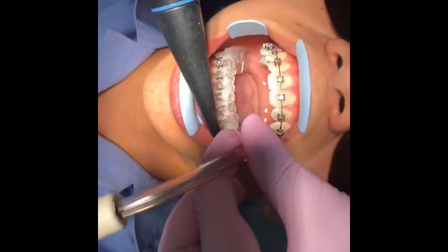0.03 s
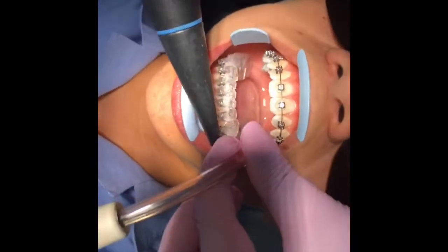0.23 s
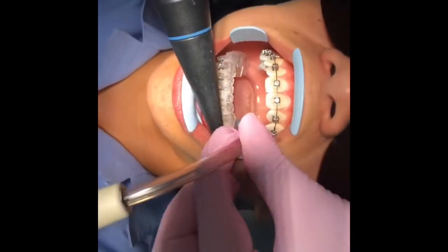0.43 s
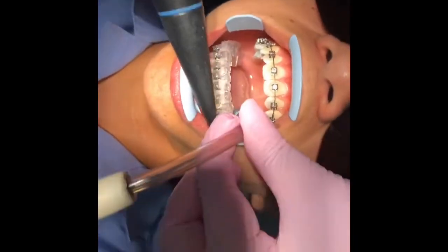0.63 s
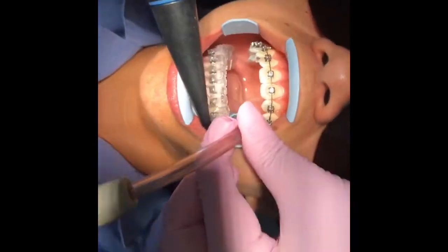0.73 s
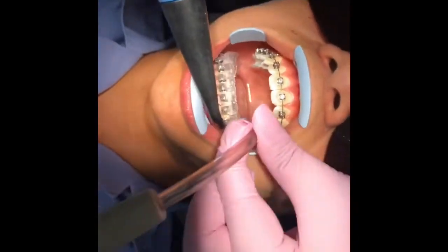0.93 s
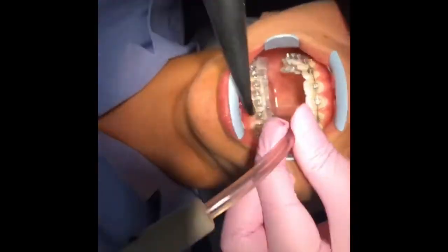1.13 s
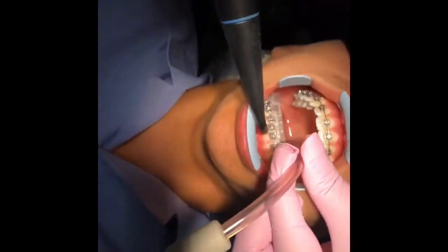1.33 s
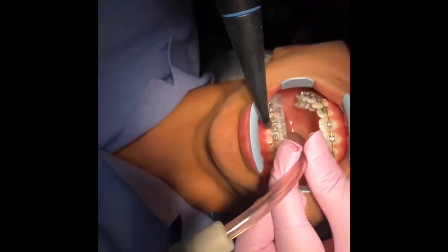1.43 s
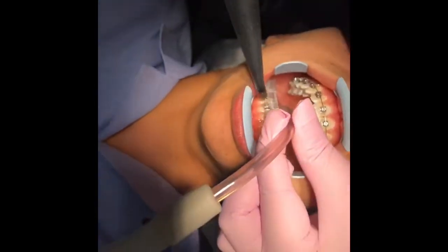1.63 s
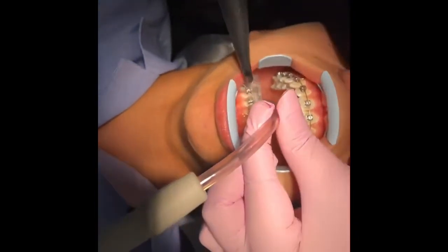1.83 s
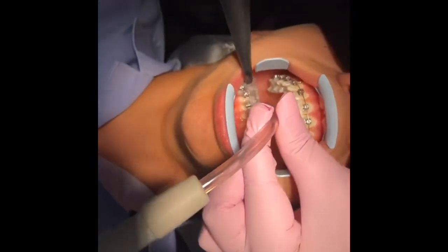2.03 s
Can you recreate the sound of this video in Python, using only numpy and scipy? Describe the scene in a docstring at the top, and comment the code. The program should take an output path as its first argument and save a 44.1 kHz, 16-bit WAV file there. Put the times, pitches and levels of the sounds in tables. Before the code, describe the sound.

Wet, slurping hiss of dental suction in an open mouth, dropping after a soft pop.

```python
"""A dental suction tip hisses and slurps, drawing air and water inside an open mouth.
Turbulent air and droplets excite the tube and the mouth cavity, with a breathy whistle on top.
The tip is half covered for a while: a low pop, then the hiss drops and changes colour.
Gulps of water ring the cavity; machines hum and rumble in the small room. The sound is mono."""
import sys
import numpy as np
from scipy import signal
from scipy.fft import rfft, irfft
from scipy.io import wavfile
from scipy.ndimage import uniform_filter1d

SR = 44100
rng = np.random.default_rng(int(sys.argv[2]) if len(sys.argv) > 2 else 0)


def persist_wave(psi):
    """Save psi, clipped to +-1, as 16-bit WAV."""
    counts = np.round(np.clip(psi, -1, 1) * 32767).astype(np.int16)
    wavfile.write(sys.argv[1], SR, np.atleast_2d(counts).T)


N = 92213

# faders of the air flow at the tip: time_s, hiss_db, cavity_db, treble_db, whistle_db
AIR_FLOW = [(0, -25.5, -40, -33.5, -45), (.03, -19.5, -24.5, -29.5, -46), (.11, -22.5, -30, -32.5, -44),
            (.24, -22, -29, -33, -34.5), (.26, -19, -40, -31, -37.5), (.31, -19, -23, -32, -32.5),
            (.34, -20.5, -25.5, -30, -36.5), (.53, -20.5, -27, -32.5, -36.5),
            (.57, -19, -25.5, -29.5, -28.5), (.6, -20, -26, -32.5, -36), (.74, -20.5, -28.5, -30, -30),
            (.82, -19, -27, -30, -32), (1.09, -20.5, -30, -30.5, -31), (1.14, -22, -33.5, -29.5, -27.5),
            (1.24, -31, -35, -36.5, -43), (1.3, -33, -36, -36, -42), (1.47, -35.5, -41, -40.5, -45.5),
            (1.59, -35, -39, -39.5, -48), (1.62, -30.5, -37, -37.5, -44), (1.8, -28.5, -34, -34.5, -43),
            (1.9, -29, -37.5, -36, -43), (2.02, -31.5, -39.5, -36, -46), (2.09, -31, -35, -35, -43)]
# the tip is covered, then opens at another place: time_s, position (0 open, 1 covered, 2 moved)
TIP_POSITION = [(0, 0.027), (1.12, 0.34), (1.24, 0.47), (1.58, 1.06), (1.62, 1.72), (2.09, 2)]
# resonances of tube and mouth, levels relative: pitch_hz, base_width_hz, open_db, covered_db, moved_db
TUBE_MODES = [(1570, 182, -15, -2, -14), (2285, 730, -16.5, 1, -19.5), (2493, 180, -10, -22, -24),
              (2658, 90, 0.5, -1, -14), (2715, 65, -6.5, -3, 4), (2840, 190, -8, -3, -4),
              (3060, 503, -3.5, 5, -3.5), (3670, 970, -28, -7, -6), (4360, 410, -15, 0.5, -3.5),
              (4774, 126, 1.5, 6, -6), (5046, 160, -4.5, 1, -9), (5295, 820, -5.5, 1, -7),
              (6450, 610, -6.5, -10, -13), (7040, 940, -9.5, 0.5, -9.5), (7940, 1050, -13, -3, -11)]
# treble resonances, levels relative: pitch_hz, base_width_hz, open_db, covered_db, moved_db
TREBLE_MODES = [(11000, 990, 0, 8, 5.5), (12200, 650, -8, -6, 6), (13430, 1550, -1, -1, 2),
                (14200, 630, -6, -11, -16), (15000, 900, 1, -11, -4)]
# close resonances of the mouth cavity: pitch_hz, base_width_hz, relative_db
CAVITY_MODES = [(1035.4, 38.4, 4.5), (1102, 80, -3), (1203.5, 121, -4.5), (888, 308, -17)]
# gulps of water that ring the cavity: start_s, peak_db, pitch_hz, rise_s
WATER_GULPS = [(0.0443, -18, 1041, 0.0035), (0.0742, -20.5, 1126, 0.0043), (0.255, -20.5, 1068, 0.0035),
               (0.2844, -21, 1036, 0.0035), (0.2944, -13.5, 1100, 0.0038), (0.3724, -34, 1060, 0.004),
               (0.4618, -16.5, 1060, 0.0042), (0.5061, -14, 1060, 0.0044), (0.566, -25, 1096, 0.004),
               (0.6934, -14, 1045, 0.0042), (0.7201, -16, 1051, 0.0043), (1.05, -26.5, 1110, 0.004),
               (1.1819, -30, 1204, 0.004), (1.2624, -33, 1110, 0.0043), (1.283, -24, 1150, 0.0038),
               (1.3779, -28, 1080, 0.0037), (1.4105, -34, 1090, 0.0034), (1.6145, -28, 1147, 0.0046),
               (1.7499, -28, 1068, 0.0038), (1.7966, -49, 1170, 0.004), (1.917, -27, 1060, 0.0037)]
# EQ curve of the room rumble: frequency_hz, relative_db
RUMBLE_EQ = [(12, -35), (20, -28), (38, 3.5), (87, -1.5), (129, -8.5), (226, -7), (267, -8.5), (519, -18),
             (800, -19.5), (1040, -11), (1760, -120)]
# machine tones: pitch_hz, rms_db
HUM_TONES = [(49, -55), (74, -49), (100, -45.5), (226, -55)]

RUMBLE_DB = -39
HUM_WAVER_DB, HUM_WAVER_PER_S, HUM_PITCH_DRIFT = 1, 4.98, 0.016
ECHO_DB, ECHO_T60_S = -13, .2
POP_S, POP_DB, POP_HZ, TICK_HZ, TICK_RELATIVE_DB = 1.19, -26, 530, 1500, -5
SPLASH_RELATIVE_DB, SPLASH_RISE_S = -17.5, .006
DROPS_PER_S, DROP_SPREAD_DB, DROPS_RELATIVE_DB = 2500, 1, -9.5
FLUTTER_DB, FLUTTER_PER_S = .55, 60  # the whole stream together
FLICKER_DB, FLICKER_PER_S = .58, 17.82  # each tube or treble resonance alone
WHISTLE_HZ, WHISTLE_BASE_WIDTH_HZ = 9616, 910
HIGH_CUT_HZ = 15770


def undb(db):
    """Gain from dB."""
    return 10 ** (np.asarray(db) / 20)


def unit(x):
    """Scale to rms 1."""
    return x / np.sqrt(np.mean(x ** 2))


def curve(table, column):
    """One column of a time table as an automation curve."""
    rows = np.array(table, float)
    return np.interp(np.arange(N) / SR, rows[:, 0], rows[:, column])


def ring(x, hz, *widths_hz):
    """Two-pole resonances in series, one per width, with gain 1 at the centre."""
    for width_hz in widths_hz:
        x = signal.lfilter(*signal.iirpeak(hz, hz / width_hz, fs=SR), x)
    return x


def wobble(per_s):
    """Smooth random modulation at rms 1, without slow drift."""
    hold = int(SR / per_s)
    steps = np.repeat(rng.standard_normal(N // hold + 1), hold)
    smooth = uniform_filter1d(uniform_filter1d(steps, hold), hold)[:N]
    return unit(smooth - uniform_filter1d(smooth, size=6 * hold))


def room_rumble():
    """A steady bed of dark noise from the machines in the room."""
    hz = np.arange(N // 2 + 1) * SR / N + 1
    eq_hz, eq_db = np.array(RUMBLE_EQ, float).T
    eq = undb(np.interp(np.log(hz), np.log(eq_hz), eq_db))
    roll_off = np.minimum(hz / eq_hz[0], 1) ** 2 * np.minimum(eq_hz[-1] / hz, 1)
    return undb(RUMBLE_DB) * unit(irfft(rfft(rng.standard_normal(N)) * eq * roll_off, N))


def machine_hum():
    """Low machine tones, each wavering in pitch and level."""
    hum = np.zeros(N)
    for hz, db in HUM_TONES:
        pitch_hz = hz * (1 + HUM_PITCH_DRIFT * wobble(HUM_WAVER_PER_S))
        phase = 2 * np.pi * (np.cumsum(pitch_hz) / SR + rng.random())
        hum += np.sqrt(2) * undb(db + HUM_WAVER_DB * wobble(HUM_WAVER_PER_S)) * np.sin(phase)
    return hum


def room_echo(x):
    """The small room adds a short diffuse tail, mixed in at constant power."""
    t = np.arange(SR // 4) / SR
    tail = rng.standard_normal(len(t)) * np.exp(-np.log(1000) * t / ECHO_T60_S)
    reverb = signal.fftconvolve(x, tail / np.sqrt(np.sum(tail ** 2)))[:N]
    return (x + undb(ECHO_DB) * reverb) / np.hypot(1, undb(ECHO_DB))


def closing_pop():
    """The tip closes: one click into a low hollow ring with a faint tick."""
    click = np.zeros(N)
    click[int(POP_S * SR)] = 1
    body = ring(click, POP_HZ, 70, 440)
    tick = ring(click, TICK_HZ, 300)
    return undb(POP_DB) * (body / body.max() + undb(TICK_RELATIVE_DB) * tick / tick.max())


def gulps(hiss):
    """Each gulp swells into a short ring of the cavity and throws a brief splash of hiss."""
    t = np.arange(3000) / SR
    rings, splash_gain = np.zeros((2, N + len(t)))
    splash_swell = t / SPLASH_RISE_S * np.exp(1 - t / SPLASH_RISE_S)
    for start_s, db, hz, rise_s in WATER_GULPS:
        span = slice(int(start_s * SR), int(start_s * SR) + len(t))
        swell = t / rise_s * np.exp(1 - t / rise_s)
        rings[span] += undb(db) * swell * np.sin(2 * np.pi * hz * t)
        splash_gain[span] += undb(db + SPLASH_RELATIVE_DB) * splash_swell
    return rings[:N] + splash_gain[:N] * hiss


def droplets():
    """Droplets burst at the tip as a fine, dense crackle."""
    size = undb(DROP_SPREAD_DB * np.minimum(rng.exponential(size=N), 3.0))
    bursts = rng.random(N) < DROPS_PER_S / SR
    return undb(DROPS_RELATIVE_DB) * unit(bursts * size * rng.choice([-1, 1], size=N))


def wet_air(drops, flutter):
    """Fresh turbulent air with the droplets in it."""
    return (rng.standard_normal(N) + drops) * flutter


def mouth_cavity(air):
    """Air rings the hollow of the mouth: close resonances in alternating polarity."""
    return unit(sum((-1) ** k * undb(db) * ring(air, hz, width_hz, 2 * width_hz)
                    for k, (hz, width_hz, db) in enumerate(CAVITY_MODES)))


def tube_hiss(modes, drops, flutter):
    """Wet air excites steep, flickering resonances; the tip position crossfades three colours."""
    bands = []
    for hz, width_hz, *_ in modes:
        band = ring(wet_air(drops, flutter), hz, 1.8 * width_hz, 1.8 * width_hz)
        bands.append(band * undb(FLICKER_DB * wobble(FLICKER_PER_S)))
    colours = [unit(undb(levels_db) @ np.array(bands)) for levels_db in np.array(modes, float).T[2:]]
    position = curve(TIP_POSITION, 1)
    return sum(np.clip(1 - np.abs(position - k), 0, 1) * colour for k, colour in enumerate(colours))


def suction_tip():
    """One fluttering spray drives tube, cavity, treble and whistle; gulps and the pop sit on top."""
    drops = droplets()
    flutter = undb(FLUTTER_DB * wobble(FLUTTER_PER_S))
    hiss = tube_hiss(TUBE_MODES, drops, flutter)
    hollow = mouth_cavity(wet_air(drops, flutter))
    treble = tube_hiss(TREBLE_MODES, drops, flutter)
    whistle = unit(ring(wet_air(drops, flutter), WHISTLE_HZ, WHISTLE_BASE_WIDTH_HZ, WHISTLE_BASE_WIDTH_HZ))
    layers = [hiss, hollow, treble, whistle]
    flow = sum(undb(curve(AIR_FLOW, column)) * layer for column, layer in enumerate(layers, start=1))
    return flow + gulps(hiss) + closing_pop()


def scene():
    """The suction tip with its echo over rumble and hum, the same in both channels."""
    mono = room_echo(suction_tip()) + room_rumble() + machine_hum()
    return np.array([mono, mono])


def record(dry):
    """A steep high cut takes off the very top of the hiss."""
    return signal.sosfilt(signal.ellip(20, .3, 90, HIGH_CUT_HZ, fs=SR, output="sos"), dry)


dry = scene()
out = record(dry)
persist_wave(out)
```